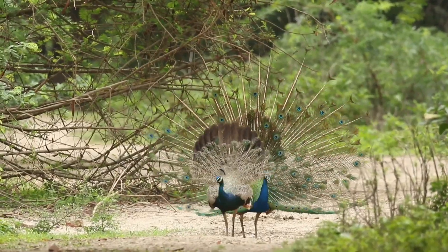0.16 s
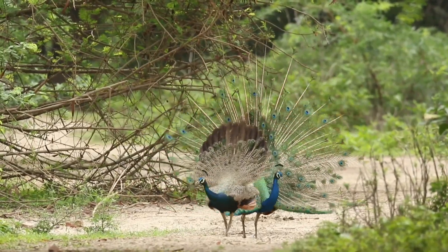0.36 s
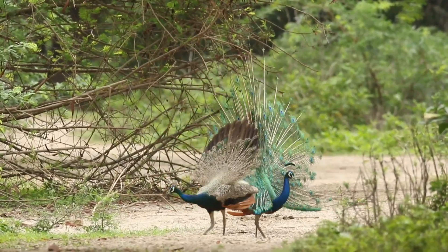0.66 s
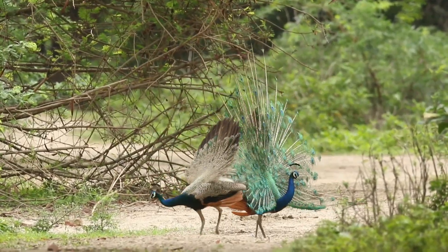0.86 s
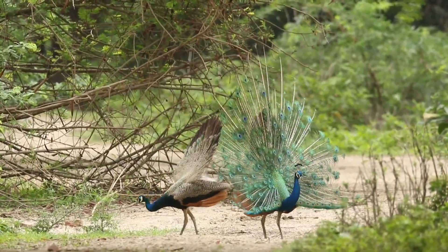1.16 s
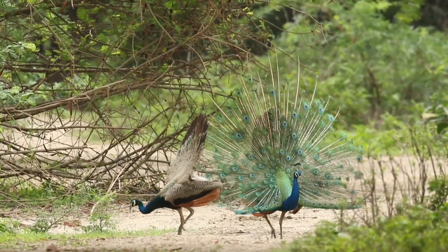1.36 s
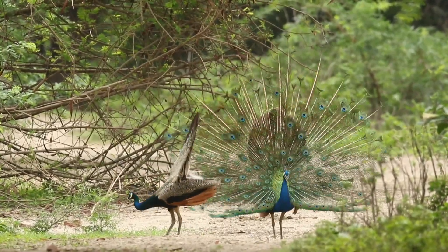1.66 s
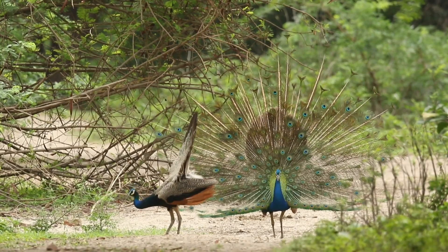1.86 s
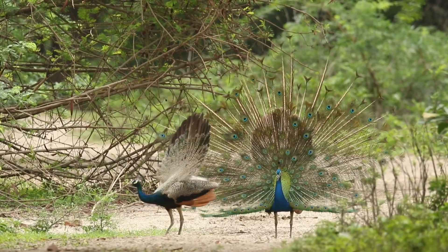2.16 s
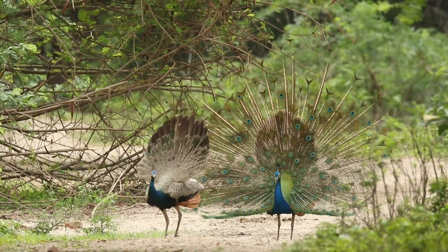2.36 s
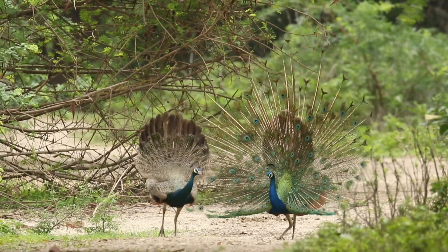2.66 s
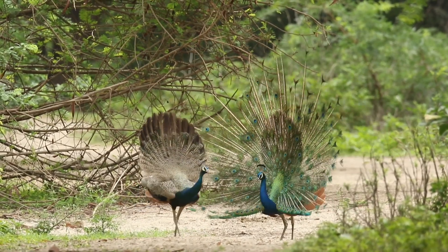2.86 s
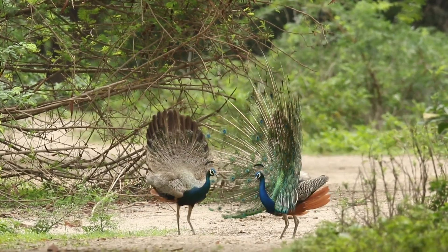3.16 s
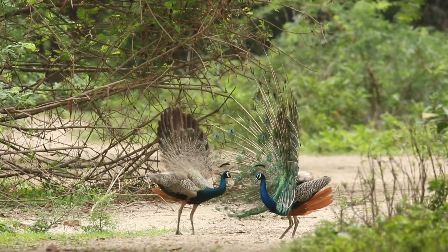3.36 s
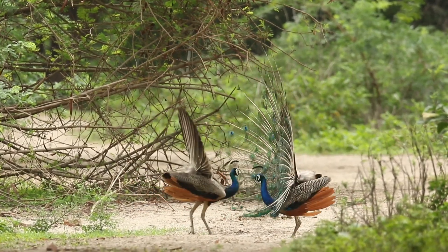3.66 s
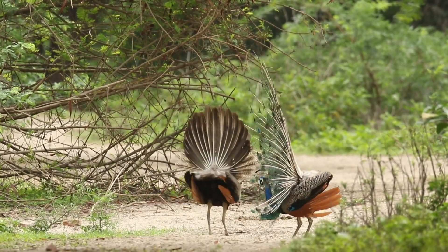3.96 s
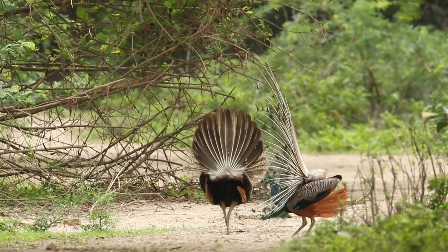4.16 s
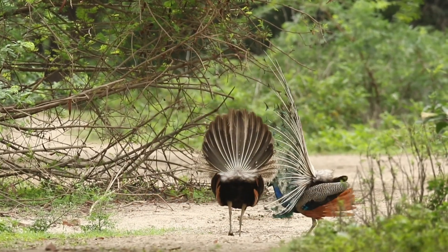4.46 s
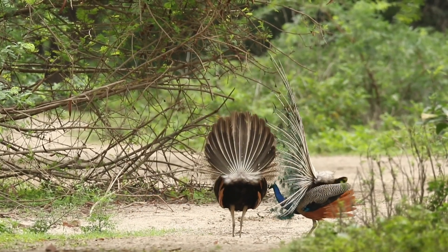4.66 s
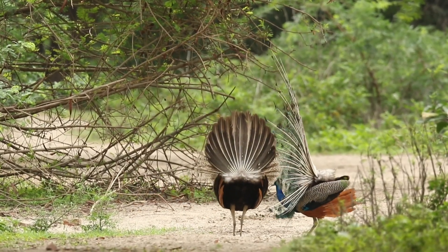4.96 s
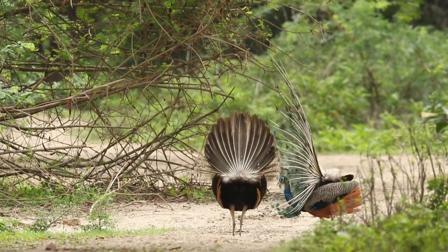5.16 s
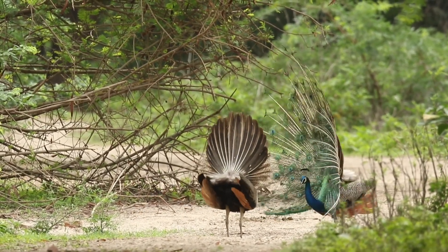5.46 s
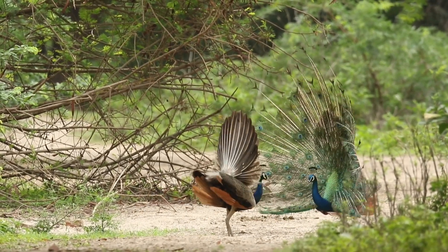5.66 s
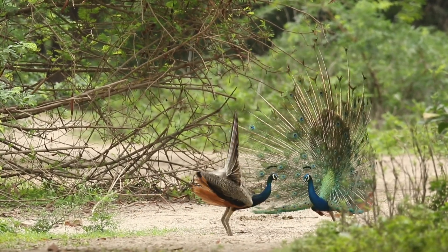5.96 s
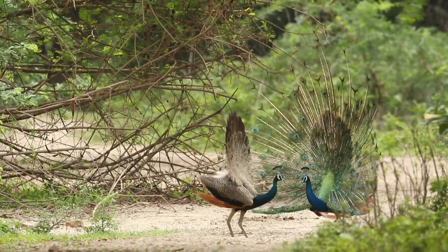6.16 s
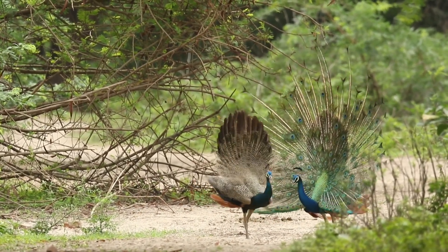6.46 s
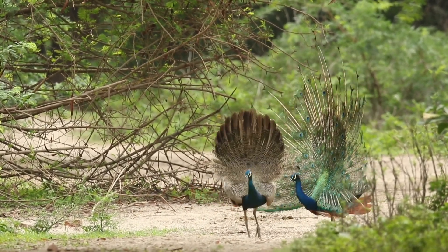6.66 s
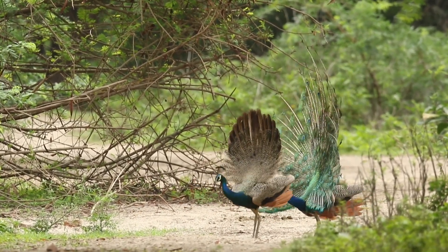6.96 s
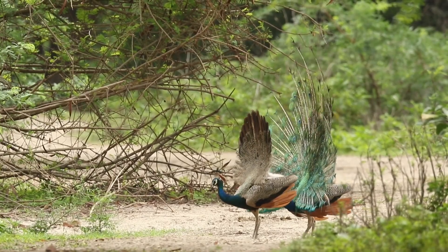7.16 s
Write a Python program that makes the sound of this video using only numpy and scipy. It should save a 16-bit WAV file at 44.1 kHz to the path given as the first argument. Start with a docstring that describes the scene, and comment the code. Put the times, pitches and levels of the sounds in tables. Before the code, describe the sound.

Outdoors among scrub and trees, a quiet hush, a rush of air and a soft low pulse, about four beats a second, form the background. A far songbird whistles briefly at the start. A peacock gives a loud wail that rises and falls from about 0.3 to 1.1 seconds, and a second from 1.9 to 2.8, both near the centre and smeared by woodland echo. Faint hums come and go. At 3.9 seconds the rush stops abruptly. Leaves stir faintly around 4.3, and a nearer songbird whistles a few short notes, slightly left, from 4.8 to 5.5. At 5.6 the rush returns with less bass and the distant whistles resume. From 6 to 6.8 seconds a peacock gives a loud, lower honk that starts with a quick flutter and sags in pitch. Another wail begins at 7.1 and is cut off as the sound ends.

```python
"""Peacocks wail among scrub and trees, over a woodland hush, a rush of air and a soft, regular low pulse.
First a far songbird whistles. Two wails follow, stacks of harmonics that rise and fall, smeared by the
wood's echo; faint hums come and go. Near 3.9 s the rush stops abruptly, leaves stir and a songbird
sings from a nearer perch. At 5.6 s the rush returns and the far whistles resume. A peacock honks at
6 s, and one more wail is just starting as the sound ends."""
import sys
import numpy as np
from scipy import signal
from scipy.fft import rfft, irfft, next_fast_len
from scipy.io import wavfile
from scipy.ndimage import uniform_filter1d, map_coordinates

SR = 44100
rng = np.random.default_rng(int(sys.argv[2]) if len(sys.argv) > 2 else 0)


def transcribe(signal):
    """Save signal, clipped to [-1, 1], as a 16-bit WAV file at the path in sys.argv[1]."""
    frames = np.atleast_2d(signal).T
    limited = np.clip(frames, -1, 1)
    pcm = np.round(limited * 32767).astype(np.int16)
    wavfile.write(sys.argv[1], SR, pcm)


N = 322371
LEAD = SR // 2  # samples made before time zero
TIME = (np.arange(N + LEAD) - LEAD) / SR

# Tone colours, or how strong each frequency is: frequency_hz, relative_db
HUSH_COLOUR = [(18, -35.5), (35, -6.5), (60, -8), (165, -16), (200, -10.5), (300, -17.5), (500, -20),
               (1030, -25), (1900, -36.5), (2700, -39), (4500, -36.5), (6500, -46), (10600, -50),
               (11100, -88.5), (22000, -120)]
AIR_COLOUR = [(24, -44.5), (40, -15.5), (87, -1.5), (123, -8), (213, -5), (280, -3), (317, -8), (407, -8.5),
              (497, -7), (975, -5.5), (1770, -13.5), (4140, -30), (15600, -35)]
AIR_RETURN_COLOUR = [(40, -11), (100, -2.5), (200, 1.5), (15000, 0)]  # the rush returns with less bass
LEAF_COLOUR = [(2600, -40), (3300, -5), (4100, 0), (5200, -5), (6200, -40)]
WHISTLE_OVERTONES = [(3800, -53.5), (5200, -33), (6300, -62.5), (8200, -38.5), (10500, -40), (11200, -71)]
THROAT_COLOUR = [(2300, 4.5), (2700, 1.7), (3300, 4.5), (3700, 3), (4500, 2), (6000, 4), (7500, -1.5),
                 (9000, 1), (11000, 0), (13000, -9), (14500, -10.5), (16000, -9.5)]  # a peacock's upper harmonics
WOOD_COLOUR = [(500, -12.5), (1700, -12), (3000, -3), (6000, -3.5), (12000, -4), (16000, -8.5)]  # the echo near the peacocks
# How alike left and right sound (1 = the same): frequency_hz, likeness
HUSH_LIKENESS = [(60, 0.7), (130, 0.66), (290, 0.52), (640, 0.36), (1410, 0.45), (3100, 0.39), (6820, 0.46),
                 (15000, 0.2)]
AIR_LIKENESS = [(60, 0.62), (130, 0.63), (290, 0.3), (640, 0.59), (1410, 0.83), (3100, 0.45), (6820, 0.069),
                (15000, 0.01)]
WOOD_LIKENESS = [(500, 0.23), (2000, 0.7), (5000, 0.47), (12000, 0)]
# Which side is louder: frequency_hz, left_minus_right_db
HUSH_BALANCE = [(60, -1), (110, 5), (200, 3.5), (380, 3.5), (700, 1.5), (1290, 1), (2380, 0), (4400, 2.5),
                (8120, -2.5), (15000, -4.5)]
AIR_BALANCE = [(60, -1), (250, -1.5), (700, -2.5), (5000, 1.5)]
# How long an echo takes to fade by 60 dB: frequency_hz, fade_s
GROVE_DECAY = [(1500, 1.1), (3000, 1.2), (10000, 0.407)]  # around the songbird
WOOD_DECAY = [(500, 1), (1700, 0.82), (3000, 0.56), (5000, 0.56), (12000, 0.31)]  # around the peacocks
# The low pulse: first_s, period_s, half_width_s, level_db
LOW_PULSE = (.201, .256, .009, -38.5)
# The stir of leaves: full_at_s, hold_s, level_db, rise_db_per_s, fall_db_per_s
LEAF_STIR = (4.29, .1, -69, 240, 45)
# Faint tones: start_s, length_s, first_hz, last_hz, relative_peak_db, peak_share
# (a share is a point in a note, from 0 at its start to 1 at its end)
HUM_NOTES = [(1.62, 0.37, 288, 300, -49, 0), (2.18, .54, 241, 244, -46, 0.93),
             (2.747, 0.736, 293, 293, -49.5, 0.86), (5.613, 0.31, 905, 890, -41.5, 0),
             (3.9, 0.23, 2450, 2450, -77, .2), (4.69, 0.7, 1590, 1490, -70, 0.7)]
# Birdsong: start_s, length_s, first_hz, turn_hz, last_hz, turn_share, relative_peak_db, peak_share
NEAR_SONG = [(4.794, .208, 1726, 1959, 1770, .5, -23.5, .55), (5.114, .04, 3430, 2040, 1960, 1, -36, 0.66),
             (5.163, .06, 1906, 2760, 2516, .45, -31.5, 0.75),
             (5.208, .075, 2576, 2510, 2140, 0.3, -28.5, 0.22),
             (5.464, 0.075, 2156, 2095, 1620, 0.5, -28, 0.42)]
FAR_SONG = [(.003, 0.0433, 2480, 2700, 2820, .6, -31.5, 0.293),
            (.088, .022, 1970, 1924, 1950, .65, -31.5, .6),
            (.112, 0.033, 2250, 2310, 2054, 0.46, -31.5, .5),
            (.203, 0.025, 2520, 2806, 3050, 0.72, -38.5, 0.49),
            (0.239, 0.046, 2130, 1920, 1727, .55, -25, 0.593),
            (5.632, 0.087, 2470, 2640, 2245, 0.13, -34, 0.39),
            (5.73, 0.069, 2456, 2430, 1970, 0.39, -26.5, 0.36),
            (5.792, .028, 2018, 2137, 2120, .6, -27.5, .45),
            (5.818, 0.119, 2300, 2650, 2610, 0.63, -36, 0.19),
            (5.981, 0.016, 2710, 2850, 2810, .6, -37, .6), (6.015, .145, 1800, 2020, 2043, 0.74, -29, 0.49),
            (6.39, 0.084, 2240, 2535, 2164, 0.43, -27, 0.99),
            (6.805, .132, 2600, 2897, 2960, 0.45, -31, 0.14), (7.001, 0.12, 2330, 2116, 2698, .5, -32, .4)]
# Peacock calls, one list each, the first heard only as echo: time_s, pitch_hz, second_harmonic_db
CALL_CURVES = [
    [(-.4, 888, -8.5), (-.12, 833.6, -15), (-.03, 750.6, -16.5)],
    [(0.33, 620.6, -27.5), (0.374, 666.3, -21), (0.458, 668.3, -22.5), (0.498, 786.3, -11),
     (0.534, 813.7, -10.5), (0.642, 873, -15.5), (0.702, 882.3, -10), (0.81, 877, -9),
     (0.878, 866.3, -19.5), (0.92, 856, -9), (0.978, 831, -14), (1.014, 758.4, -16.5), (1.082, 675, -33)],
    [(1.887, 599, -29), (1.947, 650.6, -23), (2.035, 641.7, -24.5), (2.079, 757.6, -13.5),
     (2.103, 797.7, -12), (2.187, 851.3, -14.5), (2.231, 883.7, -21), (2.351, 911.5, -14),
     (2.443, 897.5, -13.5), (2.487, 883.7, -8), (2.571, 874, -17), (2.619, 858.5, -8.5), (2.687, 818, -13),
     (2.767, 679, -22.5)],
    [(5.985, 723, -27), (6.033, 703.6, -38), (6.073, 689, -37), (6.09, 690, -22.5), (6.113, 706.7, -18),
     (6.173, 727.4, -13), (6.225, 717.6, -10.5), (6.293, 710.5, -7.5), (6.381, 705.9, -9),
     (6.557, 692.5, -11.5), (6.593, 684.7, -8.5), (6.689, 646, -10.5), (6.757, 616.4, -15.5)],
    [(7.112, 552, -29), (7.136, 582, -25), (7.168, 597.5, -23.5), (7.232, 587, -28), (7.245, 615, -21),
     (7.272, 688, -14.5), (7.308, 724.4, -19)],
]
# How a call's harmonics change as it goes:
# share, first_db, third_db, fourth_and_fifth_lift_db, treble_db, tilt_db_per_octave
WAIL = [(0, -33, -37.5, 5, -71.5, -14), (.03, -29.5, -21.5, -0.5, -68, -16.5),
        (.06, -30, -22.5, 2, -60.5, -16.5), (.17, -28.5, -18, 2.5, -55.5, -11.5),
        (.22, -23, -31.5, 4, -50, -1), (.27, -22, -29, -6, -39, -3.5), (.36, -18.5, -29.5, -7, -41, 1),
        (.46, -21, -33, -7.5, -40, -2), (.53, -18, -31.5, -2.5, -38.5, -2),
        (.62, -21, -39.5, -0.1, -39, -1.5), (.72, -21.5, -44, 1.5, -39.5, -1.5),
        (.83, -25, -34, -2.5, -41.5, -2), (.9, -28, -33.5, 0, -53, -3.5), (1, -36, -29, 3, -57.5, -6)]
HONK = [(0, -18, -58, 3, -73, -9), (.06, -38.5, -38, -7, -68, -7), (.09, -18.5, -36, -16, -65, -20),
        (.115, -29.5, -35, 1.5, -68, -2), (.166, -23.5, -36, -8, -52, -7), (.25, -25, -44, -4.5, -43.5, 3),
        (.32, -25, -38.5, -7, -45.5, -8.5), (.42, -19.5, -33.5, -3.5, -45, -4),
        (.74, -21, -47, 7, -47, 1.6), (.91, -30, -27, 4.5, -54.5, -2.5), (1, -27, -37, 1, -73, -14)]
# Each call's voice: colour, share_from, share_to, first_lift_db, third_lift_db, treble_lift_db, tremble_db
CALL_VOICES = [(WAIL, 0.67, 0.94, 2.5, .4, 1.44, .5), (WAIL, 0, 1, -.7, -1.3, 0.23, 0.48),
               (WAIL, 0, 0.97, 0.83, 1.5, 0.36, 0.69), (HONK, 0, 0.99, 0, 0, 0, 1.5),
               (WAIL, 0, 0.24, 1.3, -0.78, 0.22, .4)]
# The honk starts in puffs: from_s, to_s, puffs_per_s
HONK_PUFFS = (5.4, 6.1, 48.3)

AIR_DB, AIR_RETURN_GAIN_DB, AIR_GAP_S, AIR_EDGE_S = -39.5, 0.8, (3.876, 5.612), 0.002
NEAR_FADE_DB, FAR_FADE_DB, HUM_FADE_DB = (20, 16.5), (4.5, 5.5), (2, 8.5)  # start, end: under the peak
NEAR_BEND, FAR_BEND, HUM_BEND = 1.6, 1.2, 2.1  # how roundly pitch and level turn (1 = straight)
TILT_PIVOT_HZ, TOP_HZ = 6000, 15700
SIDES = np.array([[0.5], [-0.5]])  # splits a difference between left and right


def amp(db):
    """Turn decibels into a gain."""
    return 10 ** (np.asarray(db) / 20)


def unit(x):
    """Scale to an average (rms) level of 1."""
    return x / np.sqrt(np.mean(x ** 2) + 1e-20)


def along(points, hz):
    """Read a table between its frequencies, on a log scale."""
    table_hz, values = np.transpose(points)
    return np.interp(np.log(hz + 1), np.log(table_hz + 1), values)


def wobble(rate, size):
    """A smooth random curve with `rate` new values a second."""
    values = rng.standard_normal(int(size * rate / SR) + 4)
    return map_coordinates(values, [np.arange(size) * rate / SR])


def filtered(x, response):
    """Multiply each frequency in x by response(hz)."""
    size = next_fast_len(x.shape[-1] + 8192)
    return irfft(rfft(x, size) * response(np.fft.rfftfreq(size, 1 / SR)), size)[..., :x.shape[-1]]


def noise(colour, likeness, patchy_db):
    """Stereo noise with randomly louder and softer patches."""
    grid = signal.stft(rng.standard_normal((2, N + 512)), nperseg=512)[2]
    patches = uniform_filter1d(rng.standard_normal(grid.shape[1:]), size=6, axis=0)
    patches = unit(uniform_filter1d(patches, size=14, axis=1))
    pair = signal.istft(grid * amp(patchy_db * patches), nperseg=512)[1][:, :N]
    width = lambda hz: np.arccos(np.clip(along(likeness, hz), -1, 1)) / 2
    mid, side = filtered(pair, lambda hz: amp(along(colour, hz)) * [np.cos(width(hz)), np.sin(width(hz))])
    return unit(np.array([mid + side, mid - side]))


def woodland_hush():
    """The quiet wood: soft, low noise that never stops."""
    hush = noise(HUSH_COLOUR, HUSH_LIKENESS, patchy_db=0.9)
    return amp(-52) * filtered(hush, lambda hz: amp(along(HUSH_BALANCE, hz) * SIDES))


def air_rush():
    """A louder rush of air stops abruptly, then returns with less bass."""
    t = TIME[LEAD:]
    stop_s, return_s = AIR_GAP_S
    air = noise(AIR_COLOUR, AIR_LIKENESS, patchy_db=1.58)
    air = filtered(air, lambda hz: amp(along(AIR_BALANCE, hz) * SIDES))
    thinner = amp(AIR_RETURN_GAIN_DB) * filtered(air, lambda hz: amp(along(AIR_RETURN_COLOUR, hz)))
    gate = np.clip(np.maximum(stop_s - t, t - return_s) / AIR_EDGE_S + 1, 0, 1)
    return amp(AIR_DB + 0.4 * wobble(3.5, N)) * gate * np.where(t < stop_s + 1, air, thinner)


def low_pulse():
    """A soft, regular push, the same on both sides."""
    first_s, period_s, width_s, db = LOW_PULSE
    from_peak_s = (TIME[LEAD:] - first_s + period_s / 2) % period_s - period_s / 2
    push = amp(db) * np.exp(-(from_peak_s / width_s) ** 2 / 2)
    return push - push.mean()


def leaf_rustle():
    """Leaves stir once in the quiet, in clumps."""
    full_s, hold_s, db, rise, fall = LEAF_STIR
    t = TIME[LEAD:]
    level_db = db - rise * np.clip(full_s - t, 0, 1) - fall * np.clip(t - full_s - hold_s, 0, 1)
    return amp(level_db + 2.5 * wobble(25, N)) * noise(LEAF_COLOUR, HUSH_LIKENESS, patchy_db=1.8)


def note_curve(start_s, length_s, first_hz, turn_hz, last_hz, turn, peak_db, peak, fade_db, bend):
    """A note eases to a pitch and on, swelling once. Gives rows of time_s, pitch_hz, level_db."""
    share = np.linspace(0, 1, num=17)
    away = lambda at: (np.clip(1 - share / at, 0, 1), np.clip((share - at) / (1 - at), 0, 1))
    before, after = away(np.clip(turn, 0.02, 0.98))
    rise, fall = away(np.clip(peak, 0.02, 0.98))
    hz = turn_hz + (first_hz - turn_hz) * before ** bend + (last_hz - turn_hz) * after ** bend
    db = peak_db - fade_db[0] * rise ** bend - fade_db[1] * fall ** bend
    return np.transpose([start_s + length_s * share, hz, db])


def trace(curve, edge_s):
    """Give a note's samples, its smoothed pitch and level, and a fade in and out."""
    times, *columns = np.transpose(curve)
    span = slice(*np.searchsorted(TIME, [times[0], times[-1] + edge_s]))
    t = TIME[span]
    fade = np.clip(np.minimum(t - times[0], times[-1] + edge_s - t) / edge_s, 0, 1)
    smooth = [uniform_filter1d(np.interp(t, times, c), size=SR // 80, mode="nearest") for c in columns]
    return span, smooth, fade


def whistle(curves, overtones, waver):
    """Nearly pure notes; the higher ones have stronger overtones."""
    out = np.zeros(len(TIME))
    for curve in curves:
        span, (hz, db), fade = trace(curve, edge_s=0.0054)
        phase = 2 * np.pi * np.cumsum(hz * (1 + waver * wobble(33, len(hz)))) / SR
        upper = sum(amp(along(overtones, k * hz)) * np.sin(k * phase) for k in range(2, 6))
        tone = np.sin(phase) + np.clip(hz / 2500, 0, 1) ** 4 * upper
        out[span] += np.sqrt(2) * amp(db) * fade * tone
    return out


def hums():
    """Faint drifting tones, a little to the right; the low ones waver more."""
    notes = [note_curve(start, length, first, (first + last) / 2, last, 0.67, db, peak,
                        HUM_FADE_DB, HUM_BEND) for start, length, first, last, db, peak in HUM_NOTES]
    low = whistle([n for n in notes if n[0, 1] < 500], overtones=[(100, -87)], waver=0.015)
    low *= amp(2.5 * wobble(7, len(TIME)))
    high = whistle([n for n in notes if n[0, 1] >= 500], overtones=[(100, -87)], waver=0.009)
    return (low + high) * amp([[-3], [2]])


def placed(x, lead_s, pan_db):
    """A sound left of centre is louder on the left and gets there lead_s sooner."""
    return amp(pan_db * SIDES) * filtered(x, lambda hz: np.exp(2j * np.pi * hz * lead_s * SIDES))


def tree_echo(x, decay, colour, likeness, near_db, near_fade_s):
    """Near branches answer briefly; far trunks answer long, each frequency dying at its own speed."""
    hz, t, grid = signal.stft(rng.standard_normal((2, SR)), SR, nperseg=256)
    far = amp(-60 * t / along(decay, hz)[:, None])
    near = amp(-60 * t / near_fade_s)
    fade = far / np.linalg.norm(far, axis=1, keepdims=True) + amp(near_db) * near / np.linalg.norm(near)
    width = np.arccos(np.clip(along(likeness, hz), -1, 1))[:, None] / 2
    grid = grid * amp(along(colour, hz))[:, None] * fade
    mid, side = grid[0] * np.cos(width), grid[1] * np.sin(width)
    tail = signal.istft(np.array([mid + side, mid - side]), SR, nperseg=256)[1] / np.sqrt(128)
    delayed = np.pad(tail, ((0, 0), (SR // 200, 0)))
    return signal.oaconvolve(x[None], delayed, axes=1)[:, :len(x)]


def songbird():
    """Whistles from two perches; from the far one, more of what is heard is echo."""
    near_notes = [note_curve(*row, NEAR_FADE_DB, NEAR_BEND) for row in NEAR_SONG]
    far_notes = [note_curve(*row, FAR_FADE_DB, FAR_BEND) for row in FAR_SONG]
    near = whistle(near_notes, WHISTLE_OVERTONES, waver=0.005)
    far = whistle(far_notes, WHISTLE_OVERTONES, waver=0.009)
    far *= amp(3 * wobble(45, len(TIME)))  # broken up by leaves
    direct = amp(-2) * placed(near, lead_s=0, pan_db=4) + amp(-7) * placed(far, lead_s=0, pan_db=1)
    return direct + tree_echo(near + far, GROVE_DECAY, colour=[(1900, -14), (2600, -7), (9000, -3)],
                              likeness=[(2000, 0.76)], near_db=3, near_fade_s=0.12)


def honk_puffs(t):
    """A gain that chops the start of the honk into quick puffs."""
    from_s, to_s, rate = HONK_PUFFS
    depth = np.clip((to_s + 0.023 - t) / 0.017, 0, 1) * (t > from_s - 0.01)
    return 1 - 0.9 * depth * np.cos(np.pi * rate * (t - from_s)) ** 2


def peacock_call(curve, colour, share_from, share_to, first_lift_db, third_lift_db, treble_lift_db,
                 tremble_db):
    """Harmonics (multiples of one pitch), hoarse where it slides; high ones flicker through the leaves."""
    span, (hz, second_db), fade = trace(curve, edge_s=0.008)
    size = len(hz)
    shares, *levels = np.transpose(colour)
    progress = np.linspace(share_from, share_to, size)
    first_db, third_db, middle_db, treble_db, tilt_db = [np.interp(progress, shares, c) for c in levels]
    slide = uniform_filter1d(abs(np.gradient(np.log(hz))) * SR, size=SR // 12)  # how fast the pitch moves
    jitter = 0.0015 * wobble(60, size) + (0.0008 + 0.0055 * slide) * wobble(300, size)
    phase = 2 * np.pi * np.cumsum(hz * (1 + jitter)) / SR
    low_db = first_db + first_lift_db, second_db, third_db + third_lift_db
    voice = sum(amp(db + 0.81 * wobble(40, size)) * np.sin(k * phase) for k, db in enumerate(low_db, 1))
    for k in range(4, int(TOP_HZ / hz.min())):
        db = treble_db + treble_lift_db + tilt_db * np.log2(k * hz / TILT_PIVOT_HZ)
        db += along(THROAT_COLOUR, k * hz) + middle_db * (k < 6)
        flicker_db = 1.2 * wobble(15.1, size) + (2.5 + 0.48 * tremble_db) * wobble(90.8, size)
        voice += amp(db + flicker_db) * np.sin(k * phase + rng.uniform(0, 2 * np.pi)) * (k * hz < TOP_HZ)
    tremble_hz = 50 + 7 * wobble(12.7, size)
    tremble = amp(tremble_db * np.sin(2 * np.pi * np.cumsum(tremble_hz) / SR))
    call = np.sqrt(2) * voice * fade * honk_puffs(TIME[span]) * tremble
    return span.start, np.pad(call, (0, SR))  # room for the echo


def peacocks():
    """The peacock calls, all from near the centre, each followed by the wood's echo."""
    out = np.zeros((2, len(TIME) + SR))
    for curve, voice in zip(CALL_CURVES, CALL_VOICES):
        start, call = peacock_call(curve, *voice)
        echo = tree_echo(call, WOOD_DECAY, WOOD_COLOUR, WOOD_LIKENESS, near_db=-2.5, near_fade_s=0.26)
        out[:, start:start + len(call)] += placed(call, lead_s=3.5e-5, pan_db=-0.5) + echo
    return out[:, :len(TIME)]


def scene():
    """Add the birds and hums to the background."""
    voices = (peacocks() + songbird() + hums())[:, LEAD:]
    return voices + air_rush() + woodland_hush() + leaf_rustle() + low_pulse()


def record(dry):
    """The loudest peaks round off softly; nothing above TOP_HZ is kept."""
    rounded = dry / (1 + abs(dry / 0.98) ** 6) ** (1 / 6)
    return filtered(rounded, lambda hz: hz < TOP_HZ)


dry = scene()
out = record(dry)
transcribe(out)
```